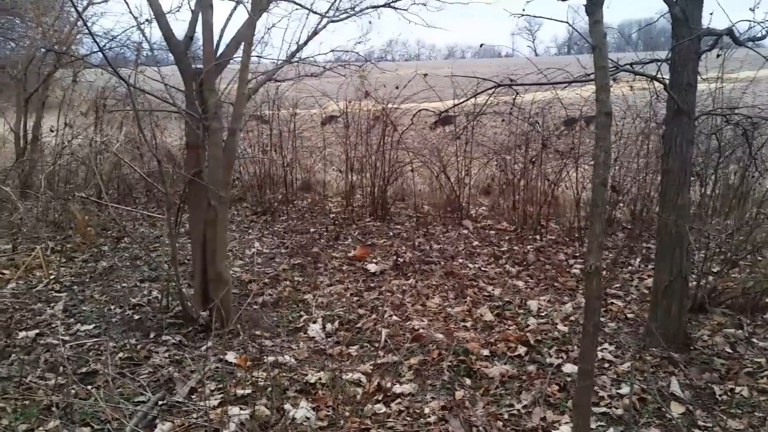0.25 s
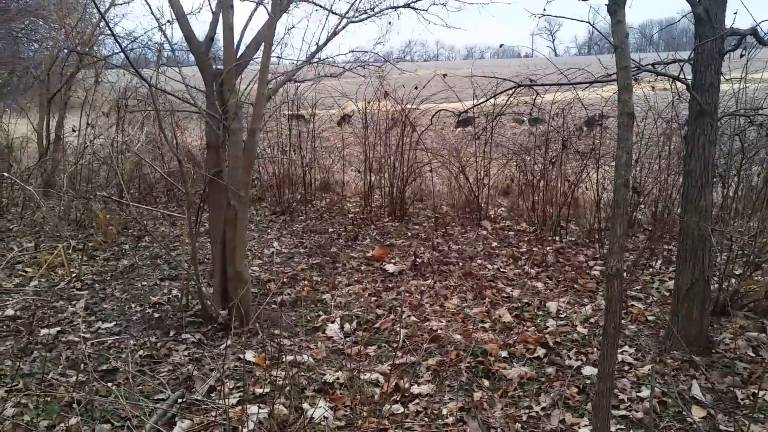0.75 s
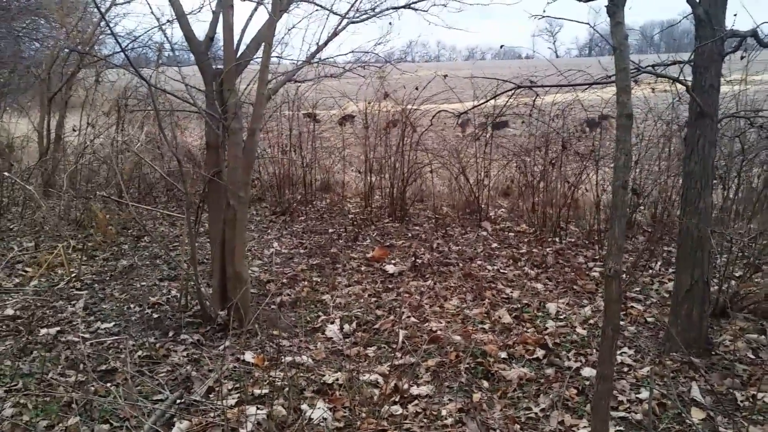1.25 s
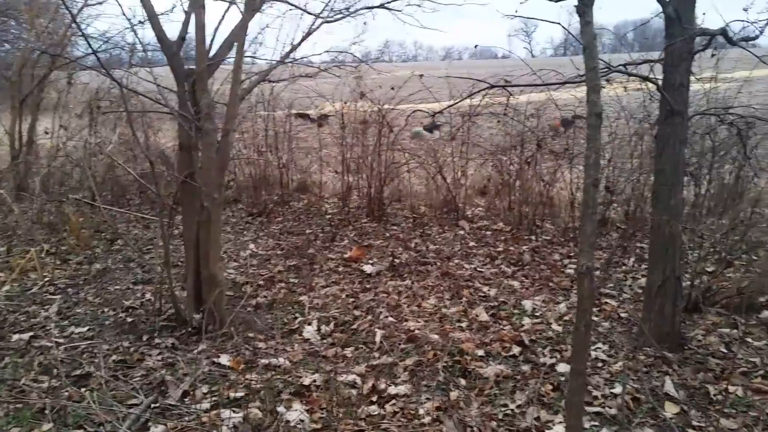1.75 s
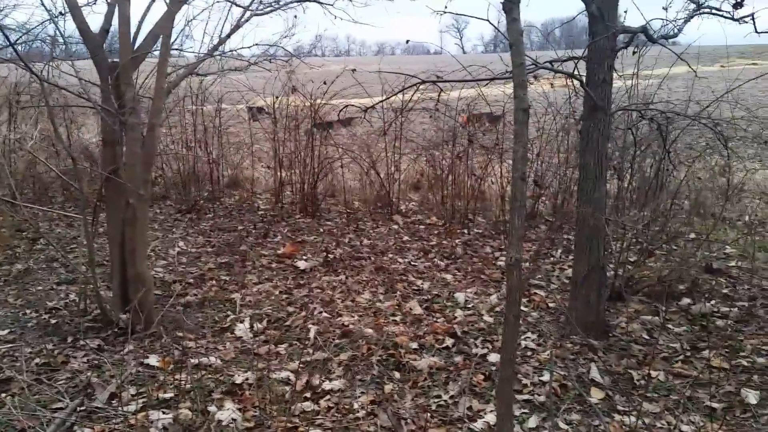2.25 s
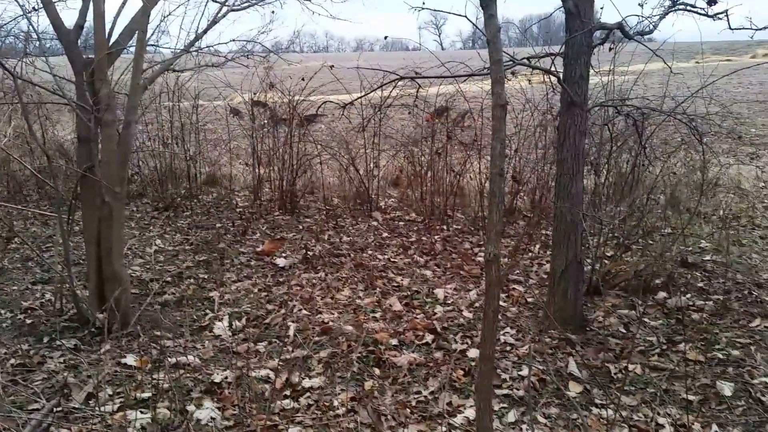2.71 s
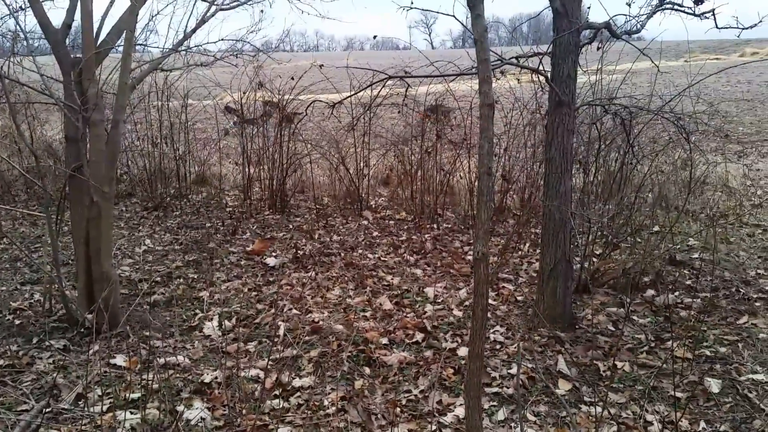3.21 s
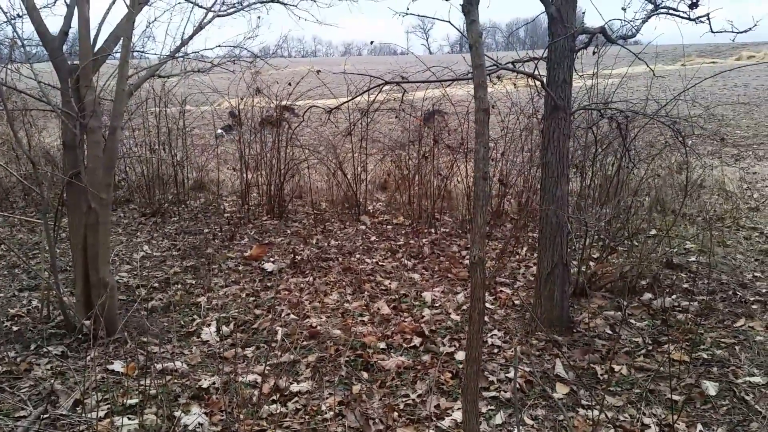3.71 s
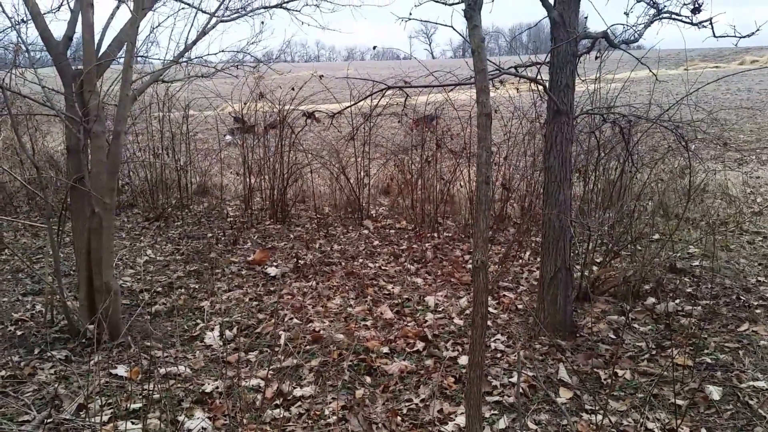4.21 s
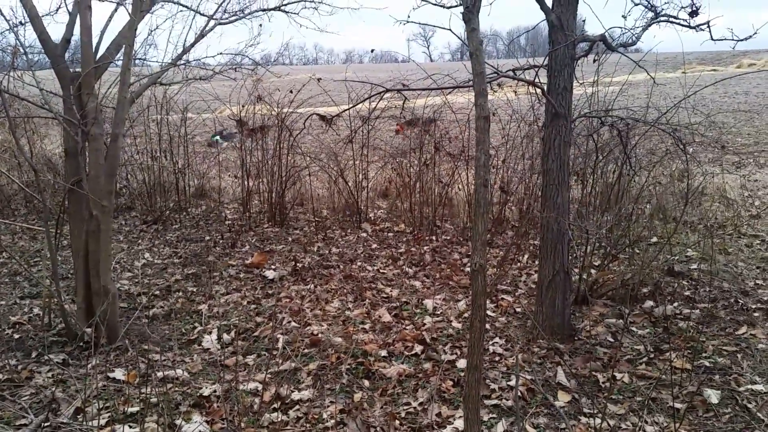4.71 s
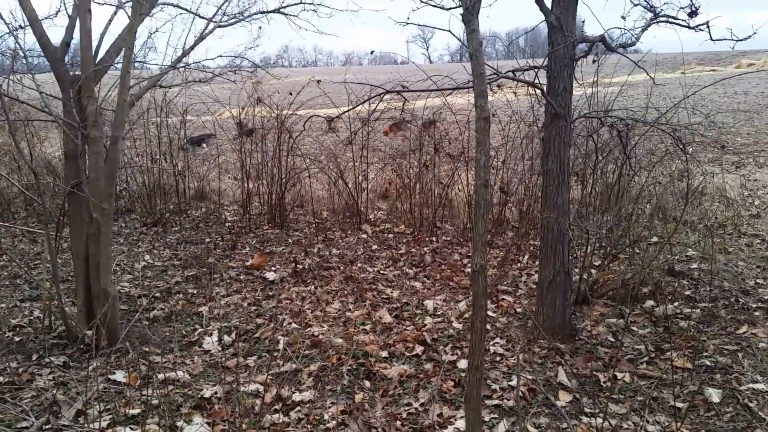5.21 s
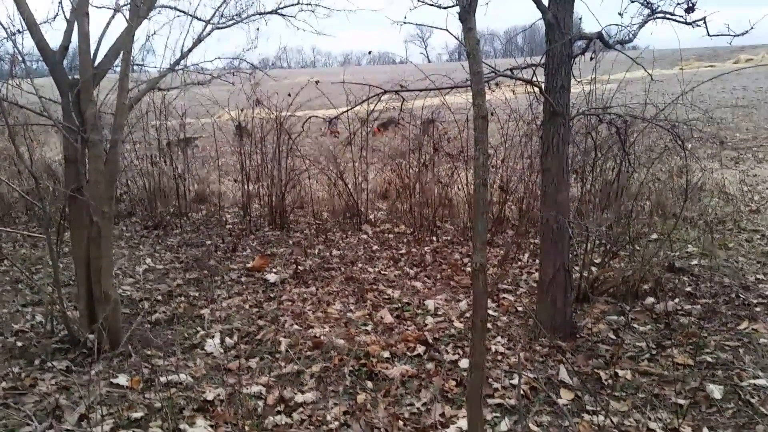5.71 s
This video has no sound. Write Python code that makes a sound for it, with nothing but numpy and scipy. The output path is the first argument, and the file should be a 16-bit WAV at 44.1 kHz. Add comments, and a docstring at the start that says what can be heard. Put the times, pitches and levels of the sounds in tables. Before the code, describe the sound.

Outdoor handheld capture at a bare wood edge: faint leafy hiss and low wind, with delicate metallic clinks close by on the left. Far hounds call hollow and mid-pitched, two long drooping bawls first, then separate brief yelps with gaps between, then another hoarse bawl cut off at the end. Scattered tree echoes trail each call; a few sharp leaf cracks and soft wind thumps on the left punctuate.

```python
"""Hounds over a far field

Hounds bay: long bawls and short arching yelps from harmonic voices, hoarse rasps from irregular puffs;
sparse and decaying noise echoes answer as the edge of a wood. Close on the left a metal clip jingles
(decaying modes) and dry leaves crack (noise bursts); hiss with some leaf rustle and a fine treble hiss
(shaped noise) lie over a breeze that rumbles and bumps (low noise).
"""
import sys
import numpy as np
from scipy import signal
from scipy.fft import rfft, irfft, next_fast_len
from scipy.io import wavfile
from scipy.ndimage import map_coordinates

SR = 44100
rng = np.random.default_rng(int(sys.argv[2]) if len(sys.argv) > 2 else 0)


def generate_wav(sig):
    """Save sig (samples, or channels by samples) to the path in sys.argv[1] as 16-bit PCM at SR."""
    pcm = np.round(np.clip(np.atleast_2d(sig).T, -1, 1) * 32767).astype(np.int16)
    wavfile.write(sys.argv[1], SR, pcm)


N = 262395
T = np.arange(N) / SR

# Mid-treble hiss course, with some leaf rustle: t/s, relative level/dB
HISS_COURSE = [(0.0, -72.5), (0.16, -62.5), (0.33, -62.5), (0.64, -62.5), (1.11, -60.5), (1.29, -64.5),
               (2.09, -63), (2.62, -67.5), (2.88, -66.5), (3.05, -62), (3.4, -68.5), (3.65, -67.5),
               (3.93, -63), (4.17, -70), (4.41, -65), (5.49, -68.5), (5.78, -65.5), (5.95, -61.5)]
# Treble hiss course: t/s, relative level/dB
TREBLE_COURSE = [(0.0, -79), (0.13, -68), (0.33, -68), (0.79, -66.5), (1.19, -70.5), (2.35, -69),
                 (2.58, -73), (2.8, -74), (3.03, -68.5), (3.48, -74), (4.49, -71), (4.82, -79.5),
                 (5.04, -70.5), (5.44, -75.5), (5.72, -75.5), (5.95, -68)]
# Mid-treble hiss spectrum: f/Hz, relative density/dB
HISS_SPECTRUM = [(1410, -4), (2400, -7.5), (2670, -15.5), (2790, -6.5), (2920, -12), (3030, -6.5),
                 (3480, -0.5), (4660, 1), (8460, -19.5), (10000, -50.5), (13000, -52), (22000, -120)]
# Treble hiss spectrum: f/Hz, relative density/dB
TREBLE_SPECTRUM = [(5290, -47.5), (9000, -16.5), (11200, -10.5), (11700, -6.5), (14200, -7), (15500, -2.5),
                   (16100, -5), (16500, -51.5), (16800, -56)]
# Breeze strength: t/s, relative level/dB
BREEZE_COURSE = [(0, -70), (.18, -65.5), (.36, -57.5), (.7, -60), (1.45, -63.5), (2.0, -56), (2.35, -68),
                 (2.8, -66.5), (3.0, -62), (3.2, -62), (3.45, -69.5), (4.2, -65), (4.45, -66.5),
                 (4.8, -65.5), (5.6, -65), (5.95, -59)]
# Breeze spectrum: f/Hz, relative density/dB
BREEZE_SPECTRUM = [(12, -37.5), (20, -0.5), (86, -0.5), (125, -1), (189, -6), (307, -10.5), (400, -12.5),
                   (520, -26), (880, -120)]
# Open-field hush spectrum: f/Hz, relative density/dB
FIELD_SPECTRUM = [(120, -29), (200, -15.5), (422, -14), (524, -12), (650, -13), (2530, -26.5),
                  (2770, -18.5), (3000, -22.5), (3900, -52.5), (6600, -120)]
# Air bumps on the left port: t/s, relative level/dB, Gaussian sigma/s, upper edge/Hz
AIR_BUMPS = [(0.452, -37, 0.016, 110), (1.859, -39, 0.028, 300), (1.902, -26, 0.0064, 204),
             (2.003, -39.5, 0.0045, 264), (2.084, -42.5, 0.046, 133), (2.205, -34.5, 0.011, 78.6),
             (2.451, -32.5, 0.018, 85), (2.467, -25.5, 0.0088, 108), (2.532, -36.5, 0.028, 136)]
KNOCKS = [(0.0253, -52, -67, -59), (0.2487, -21, -48.5, -55), (0.3646, -39, -56, -50),
          (0.4471, -34, -50.5, -53), (0.5442, -39, -53, -49), (0.598, -36, -47.5, -64),
          (0.687, -37, -47.5, -61), (0.7888, -40, -48.5, -57), (0.888, -27, -47, -50),
          (1.1364, -30, -48.5, -53), (1.1942, -29, -56, -45), (1.4062, -44, -60, -52),
          (1.5476, -38, -47, -48), (1.6858, -40, -46, -42), (1.9333, -47, -50.5, -64),
          (2.06, -44, -54.5, -54), (2.142, -39, -54, -49), (2.378, -45, -53, -65), (2.4834, -29, -53, -43),
          (2.8263, -44, -60, -53), (3.052, -47, -52.5, -53), (3.268, -51, -55.5, -59),
          (3.3759, -47, -53.5, -65), (3.455, -46, -54.5, -67.5), (4.0557, -45, -52.5, -60),
          (4.1565, -46, -58.5, -61), (4.2448, -50, -60, -58), (4.2944, -35.5, -50.5, -65),
          (4.402, -40, -47.5, -47), (4.583, -41, -48.5, -60), (4.7341, -47, -64, -54),
          (4.838, -27, -50.5, -66), (5.003, -37, -56.5, -44), (5.0928, -29, -52, -42),
          (5.204, -44, -53.5, -45), (5.402, -43, -55, -53), (5.4787, -43, -54, -59),
          (5.6994, -52, -70, -58), (5.7608, -52, -61, -61), (5.8805, -47, -56, -59)]
CLIP_MODES = [(2843, -13, .22), (4572, -21, .2), (6036, -20, .18), (7273, -19.5, .17), (10261, -19, .16),
              (10430, -24, .12), (11860, -9, .04), (12058, -1, .1), (13374, -5, .08), (13878, -15, .1)]
# One course per bawl: t/s, pitch/Hz, level/dB
BAWL_COURSES = [
    [(.117, 658, -44), (.15, 681.6, -24), (.197, 698, -20), (.212, 640, -26), (.265, 620, -25.5),
     (.32, 588.4, -37), (.5, 543.9, -37.5), (.71, 567.1, -37), (.8, 542, -52)],
    [(.738, 554, -31.5), (.795, 533, -25), (.9, 513.4, -34), (.98, 519.1, -32.5), (1.09, 508.3, -40.5),
     (1.19, 529.2, -36.5), (1.24, 533, -38), (1.275, 524, -51.5), (1.34, 512, -64.5)],
    [(5.71, 583, -50), (5.735, 545.6, -30.5), (5.81, 528, -31.5), (5.87, 512.7, -34), (5.96, 505.5, -40)],
]
# One manner per bawl: overtones re level/dB, octave drop from/s, to/s, its strength re level/dB,
# its lowest line re that strength/dB
BAWL_MANNERS = [(-12, 0.21, 0.4, -24.5, -6), (-22, 0.91, 1.19, -5.5, -8.5), (-25.5, 5.78, 6.0, -5.5, -11.5)]
# Mouth colour of a bawl's overtones: f/Hz, gain/dB
MOUTH = [(1000, -1.5), (1130, 3), (1260, -11), (1380, -7.5), (1650, -27), (1850, -25), (2030, -26),
         (2130, -40), (2300, -48), (2800, -60)]
# Hoarse stretches: t/s, attack/s, fade/s, level/dB, fall by the end/dB, brightness/dB
RASPS = [(.121, .014, 0.048, -45.5, 13, 9), (.19, .012, 0.28, -48.5, 22, 0),
         (.714, 0.028, 0.032, -33, 17, -6), (.75, 0.041, .097, -33.5, 4, -21),
         (1.174, 0.03, 0.06, -41.5, 5.5, -12), (1.812, 0.03, 0.12, -48.5, 16, 11),
         (2.828, .035, .05, -50.5, 12, 4), (4.313, .045, .12, -53.5, 6, 9),
         (5.707, 0.02, 0.045, -33, 13, 6.5)]
# Throat and mouth colour of the rasps: f/Hz, relative gain/dB
THROAT = [(150, -15.5), (260, -19.5), (400, -15), (560, -3), (900, -4), (1150, -4), (1400, -22.5),
          (1650, -22), (1950, -13), (2350, -24), (2800, -22)]
# Dry-leaf cracks: t/s, relative level/dB
CRACKS = [(0.6414, -44), (0.6487, -35), (1.1654, -53), (1.921, -33.5), (3.204, -39), (4.4858, -38),
          (5.762, -37.5)]
# Yelps: t/s, length/s, first/Hz, top/Hz, last/Hz, rise/s, level/dB, push/dB, push after/s,
# push sigma/s, overtone level/dB, overtone delay/s, overtone fall by the end/dB
YELPS = [ (0.701, 0.066, 760, 1165, 1140, 0.02, -36.5, 0.5, .04, .02, -66, .01, 8),
         (1.403, 0.16, 650, 766.5, 699, 0.043, -37, 3.5, .06, .03, -43.5, 0.011, 4.5),
         (1.805, 0.1602, 492.7, 668.4, 800, 0.035, -34.5, 14, .05, 0.014, -34.5, 0.0062, 41.5),
         (2.828, .172, 470.4, 728.8, 465, .035, -35, 11, 0.059, 0.02, -41.5, 0.0045, 6.5),
         (3.705, 0.16, 489, 716.8, 700.5, .035, -33, 1, .14, .013, -51.5, 0.012, -4.5),
         (4.302, .187, 465.5, 750, 406, 0.057, -36, 4, 0.029, 0.0083, -35, .038, 18),
         (4.849, 0.028, 309, 311, 275, 0.0087, -47, 1, .02, .01, -49, .005, -1),
         (5.193, 0.046, 685, 521, 500, .03, -48, -1, .02, .01, -70, .005, 2),
         (5.674, .052, 613, 807, 804, .03, -43, -3.5, .02, .01, -68, .005, -5), ]
# Decay of the tree line's answer: f/Hz, t60/s
WOOD_DECAY = [(200, 1.31), (700, 0.96), (1500, 0.8), (3000, 0.44)]
# Direct calls, side balance: f/Hz, left minus right/dB
HOUND_SIDE = [(250, -1), (550, -1), (750, -1.5), (1200, 4.5), (2200, 3)]
# Direct calls, left lead over right: f/Hz, phase/rad
HOUND_PHASE = [(300, 0), (700, -0.48), (1050, -0.74), (1500, -1.6), (2300, -1.5)]

HISS_GAIN_DB, TREBLE_GAIN_DB = 1.5, 4
HIGHEST_MODE_HZ = 15487
TOUCHES_PER_S, TOUCH_DB, TOUCH_SPREAD_DB = 3.3, -59.5, -0.5  # light touches between knocks
GAPE_DB, GAPE_AFTER_S, GAPE_WIDTH_S = 10, 0.026, 0.024  # overtone flare per step as the mouth gapes
SPLIT_RAMP_S = 0.017  # onset and end of the octave drop
SCOOP_POWER, DROP_POWER = 1.506, 8.44  # pitch scoop shape; lateness of the final bend
YELP_ATTACK_S, YELP_RELEASE_S = 0.024, 0.015
SHIMMER_DB, SHIMMER_PER_S = 0.5, 60  # slight fast level shimmer of the yelps, as from ground reflections
BLOOM_DB = 19  # initial overtone deficit, until the mouth opens
UPPER_STEP_DB = -13.5
CLOSING_AFTER_S, CLOSING_DB_PER_S = .06, 85  # dulling as the mouth closes
BAND_LIMIT_HZ = 16000


def amp(db):
    """Decibels to gain."""
    return 10 ** (np.asarray(db) / 20)


def unit(x):
    """Scale to rms 1."""
    return x / np.sqrt(np.mean(x ** 2) + 1e-20)


def along(points, hz):
    """Read (f/Hz, value) points on a log-frequency axis."""
    f, v = np.transpose(points)
    return np.interp(np.log(hz + 1), np.log(f + 1), v)


def curves(rows):
    """One per-sample curve for each column after the time."""
    s, *cols = np.transpose(rows)
    return [np.interp(T, s, c) for c in cols]


def wobble(rate_per_s):
    """Smooth random curve, rate_per_s knots a second."""
    coarse_t = T[::16]
    knots = map_coordinates(rng.standard_normal(8192), [coarse_t * rate_per_s], mode="wrap")
    return np.interp(T, coarse_t, knots)


def filtered(x, response):
    """Apply a complex frequency response."""
    m = next_fast_len(N + SR // 4)
    return irfft(rfft(x, m) * response(np.fft.rfftfreq(m, 1 / SR)), m)[..., :N]


def sides(left_db):
    """Left and right gains of mean 1, left_db apart."""
    half_db = np.atleast_1d(left_db) / 2
    gains = amp(np.array([half_db, -half_db]))
    return gains / gains.mean(0)


def add(track, s, x):
    """Mix x into the track at s seconds."""
    i = max(round(s * SR), 0)
    track[..., i:i + x.shape[-1]] += x[..., :max(N - i, 0)]


def rush(spectrum, shared, left_db):
    """Stereo noise, partly common to both sides; their mean has rms 1."""
    shared = np.clip(shared, 0, 1)
    common = np.sqrt(shared) * rng.standard_normal(N)
    white = common + np.sqrt(1 - shared) * rng.standard_normal((2, N))
    pair = filtered(white, lambda hz: amp(along(spectrum, hz))) * sides(left_db)
    return pair / pair.mean(0).std()


def hiss():
    """Shaped noise: mid-treble hiss with some leaf rustle, mostly left, and a fine treble hiss."""
    mid_db, = curves(HISS_COURSE)
    treble_db, = curves(TREBLE_COURSE)
    mid_gain = amp(mid_db + HISS_GAIN_DB + 0.54 * wobble(25))
    mid = mid_gain * rush(HISS_SPECTRUM, shared=0.094, left_db=15.0)
    treble_gain = amp(treble_db + TREBLE_GAIN_DB + .8 * wobble(37))
    treble = treble_gain * rush(TREBLE_SPECTRUM, shared=0.068, left_db=1.0)
    return mid + treble


def breeze():
    """Moving air: low wavering noise, brief bumps on the left port and a steady open-field hush."""
    breeze_db, = curves(BREEZE_COURSE)
    rumble_gain = amp(breeze_db + 5.0 + 3.06 * wobble(13))
    rumble = rumble_gain * rush(BREEZE_SPECTRUM, shared=0.55, left_db=1)
    bumps = np.zeros(N)
    for s, db, sigma_s, edge_hz in AIR_BUMPS:
        band = lambda hz: hz ** 2 / (hz ** 2 + 70 ** 2) / (1 + (hz / edge_hz) ** 4)
        eddy = filtered(rng.standard_normal(N), band)
        eddy = eddy * np.exp(-((T - s) / sigma_s) ** 2 / 2)
        bumps += amp(db - 6.0) * eddy / np.abs(eddy).max()
    hush = amp(-67.5) * rush(FIELD_SPECTRUM, shared=0.18, left_db=0.5)
    return rumble + bumps * sides(22) + hush


def jingles(left_db):
    """Metal clip: each knock or touch excites decaying, slightly detuned modes; two softer rebounds follow."""
    out, t = np.zeros(N), T[:SR // 3]
    hz, mode_db, t60_s = np.transpose(CLIP_MODES)[:, :, None]
    draws = rng.standard_normal((64, 4))
    times = np.cumsum(np.exp(draws[:, 0] / 2)) / TOUCHES_PER_S
    touches = np.column_stack([times, TOUCH_DB + TOUCH_SPREAD_DB * draws[:, 1:]])
    touches = touches[times < T[-1]]
    for s, contact_db, ring_db, high_db in [*KNOCKS, *touches]:
        detune = 1 + .0012 * rng.standard_normal()
        strength_db = mode_db + 2.5 * rng.standard_normal(hz.shape)
        cycles = detune * hz * t + rng.random(hz.shape)
        ring = (amp(strength_db - 60 * t / t60_s) * np.sin(2 * np.pi * cycles)).sum(0)
        high = amp(-60 * t / .075) * np.sin(2 * np.pi * detune * HIGHEST_MODE_HZ * t)
        # sixth difference tilts the contact noise to the treble
        tick = np.diff(rng.standard_normal(len(t) + 6), 6) * amp(-33 - 60 * t / .035)
        knock = amp(ring_db + 1.6) * ring + amp(high_db + 6.5) * high + amp(contact_db - 7.5) * tick
        add(out, s, knock)
        add(out, s + rng.uniform(.004, 0.01), amp(-7.0) * knock)
        add(out, s + rng.uniform(.02, .05), amp(-16) * knock)
    return out * sides(left_db)


def voice(start_s, end_s, pitch_hz, partials, jitter, shimmer_db, flutter_db):
    """Vocal folds: harmonics (multiple, dB) locked to one unsteady cycle; the higher flutter more."""
    gate = np.clip(np.minimum(T - start_s, end_s - T) / 0.00481 + .5, 0, 1)
    on = gate > 0
    unsteady_hz = pitch_hz * (1 + jitter * wobble(220))
    phase = 2 * np.pi * np.cumsum(unsteady_hz[on]) / SR
    out = np.zeros(N)
    for k, db in partials:
        depth_db = flutter_db * np.clip(k * pitch_hz[on] / 2000 - .3, 0, 1)
        gain = amp(db[on] + depth_db * wobble(90)[on])
        out[on] += gain * np.sin(k * phase + rng.uniform(0, 2 * np.pi))
    return np.sqrt(2) * out * gate * amp(shimmer_db * wobble(110))


def bawl(course, overtone_db, split_from_s, split_to_s, split_db, chest_db):
    """Long call with an early overtone flare; a period doubling of the folds adds lines halfway."""
    start_s, end_s = course[0][0], course[-1][0]
    pitch_hz, level_db = curves(course)
    gape_db = GAPE_DB * np.exp(-((T - start_s - GAPE_AFTER_S) / GAPE_WIDTH_S) ** 2)
    split = np.clip(np.minimum(T - split_from_s, split_to_s - T) / SPLIT_RAMP_S + 1, .04, 1)
    between_db = level_db + split_db + 20 * np.log10(split)
    # multiples of half the pitch: odd ones are the in-between lines
    partials = [(1, between_db + chest_db), (2, level_db), (3, between_db), (5, between_db - 34)]
    for k in range(2, 5):
        mouth_db = along(MOUTH, k * pitch_hz)
        partials.append((2 * k, level_db + overtone_db + (k - 1) * gape_db + mouth_db))
    return voice(start_s, end_s, pitch_hz / 2, partials, jitter=0.0062, shimmer_db=0.5, flutter_db=10.0)


def rasps(air_db):
    """Hoarse voice: irregular fold puffs of uneven strength, plus rushing air, ring the throat."""
    out = np.zeros(N)
    for start_s, attack_s, fade_s, db, fall_db, bright_db in RASPS:
        cycles = np.floor(np.cumsum(275 * (1 + .09 * wobble(200))) / SR)
        puffs = np.diff(cycles, prepend=0) * amp(3.1 * rng.standard_normal(N))
        source = unit(puffs - puffs.mean()) + amp(air_db) * rng.standard_normal(N)
        tilt_db = lambda hz: bright_db * np.clip(np.log2((hz + 1) / 800), 0, 1)
        colour = lambda hz: amp(along(THROAT, hz) + tilt_db(hz))
        knots_s = np.cumsum([0, attack_s, fade_s, 0.012])
        shape = np.interp(T - start_s, knots_s, [0, 1, amp(-fall_db), 0])
        out += amp(db) * shape * unit(filtered(source, colour))
    return out


def leaf_cracks(left_db):
    """Dry leaves crack: sharp, fast-decaying bursts of shaped noise."""
    out, t = np.zeros(N), T[:SR // 20]
    for s, db in CRACKS:
        add(out, s, amp(db - 10.5 - 60 * t / 0.017) * rng.standard_normal(len(t)))
    spectrum = [(1500, -23), (3500, 6.5), (7500, 1.5), (11000, -37)]  # f/Hz, gain/dB
    return filtered(out, lambda hz: amp(along(spectrum, hz))) * sides(left_db)


def yelp(start_s, length_s, first_hz, top_hz, last_hz, rise_s, level_db, push_db, push_after_s,
         push_sigma_s, overtone_db, delay_s, fall_db):
    """Short call: pitch scoops and bends, the chest pushes once, the closing mouth dulls the overtones."""
    t = np.clip(T - start_s, 0, length_s)
    scoop_hz = (first_hz - top_hz) * np.exp(-(t / rise_s) ** SCOOP_POWER)
    bend_hz = (last_hz - top_hz) * (t / length_s) ** DROP_POWER
    pitch_hz = top_hz + scoop_hz + bend_hz
    swell_db = push_db * np.exp(-((t - push_after_s) / push_sigma_s) ** 2 / 2)
    first_db = level_db + swell_db + SHIMMER_DB * wobble(SHIMMER_PER_S)
    second_db = overtone_db - fall_db * t / length_s - BLOOM_DB * np.exp(-(t / delay_s) ** 2)
    upper_db = second_db + UPPER_STEP_DB
    closing_db = CLOSING_DB_PER_S * np.maximum(t - CLOSING_AFTER_S, 0)
    partials = [(1, first_db), (2, second_db),
                (3, upper_db - 0.46 * closing_db), (4, upper_db - 5 - closing_db)]
    envelope = np.minimum(t / YELP_ATTACK_S, 1) * np.minimum((length_s - t) / YELP_RELEASE_S, 1)
    return envelope * voice(start_s, start_s + length_s, pitch_hz, partials,
                            jitter=0.013, shimmer_db=0.5, flutter_db=3.5)


def wood(x, early_db, tail_db):
    """Wood edge: near trunks scatter sparse echoes; the far tree line adds a long tail, shorter in the treble."""
    hz, t, z = signal.stft(rng.standard_normal((3, SR)), SR, nperseg=256)
    decay = amp(-60 * t / along(WOOD_DECAY, hz)[:, None])
    build = 1 - np.exp(-t / 0.017)
    tails = signal.istft(z * decay * build, SR, nperseg=256)[1][:, :SR]
    tails = tails[:2] + 0.49 * tails[2]  # third row is common to both sides
    t = T[:SR]
    trunks = rng.standard_normal((3, SR)) * (rng.random((3, SR)) < .01)
    trunks = trunks * (t > .004) * amp(-60 * t / 0.27)
    trunks = trunks[:2] + 2.6 * trunks[2]
    tail = amp(tail_db) * tails / np.linalg.norm(tails[0])
    early = amp(early_db) * trunks / np.linalg.norm(trunks[0])
    return signal.fftconvolve(x[None], tail + early, axes=1)[:, :N]


def hounds():
    """All calls, direct and through the trees; little above the throat's top resonance carries this far."""
    bawls = sum(bawl(course, *manner) for course, manner in zip(BAWL_COURSES, BAWL_MANNERS))
    calls = bawls + rasps(air_db=-4.0) + sum(yelp(*row) for row in YELPS)
    calls = filtered(calls, lambda hz: 1 / (1 + (hz / 2600) ** 40))
    half_lead = lambda hz: np.clip(along(HOUND_PHASE, hz), -2, 2) / 2

    def ports(hz):
        """Level and phase at each side; the cosine offsets the loss in their mean."""
        lead = half_lead(hz)
        return sides(along(HOUND_SIDE, hz)) * np.exp([1j * lead, -1j * lead]) / np.cos(lead)

    return filtered(calls, ports) + wood(calls, early_db=-10.0, tail_db=-16.0)


def scene():
    """Hiss, wind, near metal, cracking leaves and far hounds."""
    return hiss() + breeze() + jingles(left_db=16) + leaf_cracks(left_db=19) + hounds()


def record(dry):
    """Steep low-pass at the band limit."""
    return filtered(dry, lambda hz: 1 / (1 + (hz / BAND_LIMIT_HZ) ** 90))


dry = scene()
out = record(dry)
generate_wav(out)
```